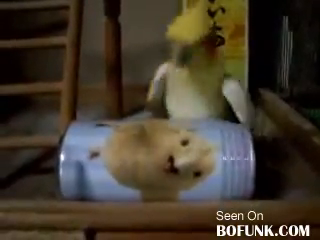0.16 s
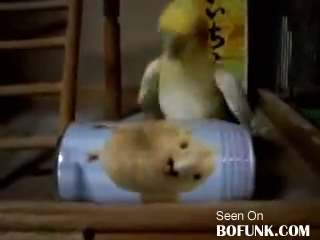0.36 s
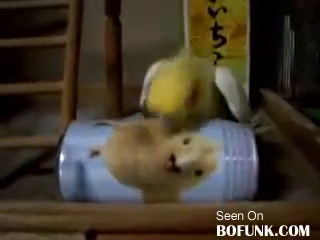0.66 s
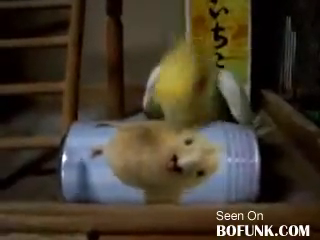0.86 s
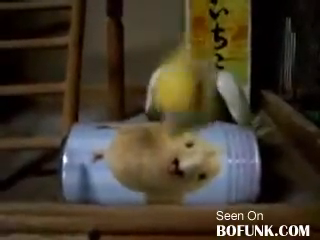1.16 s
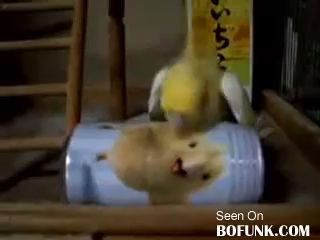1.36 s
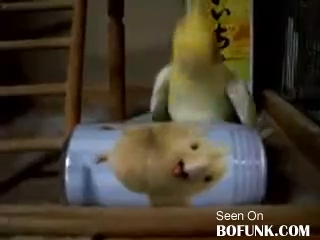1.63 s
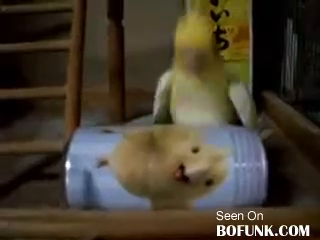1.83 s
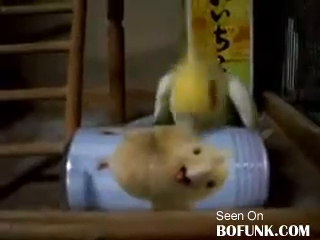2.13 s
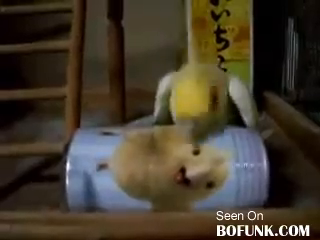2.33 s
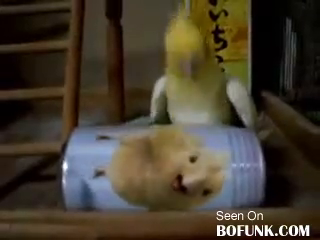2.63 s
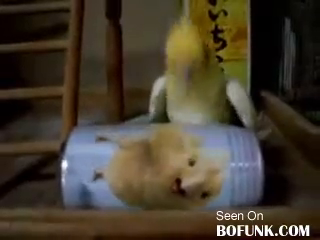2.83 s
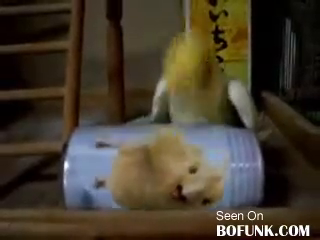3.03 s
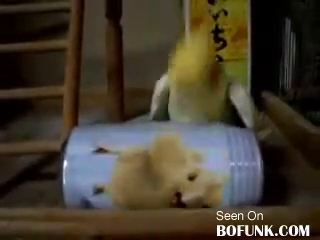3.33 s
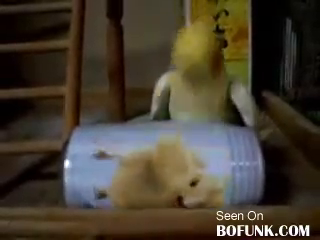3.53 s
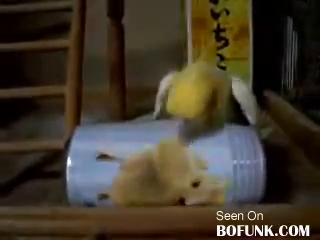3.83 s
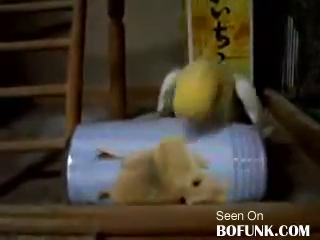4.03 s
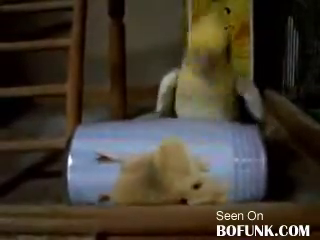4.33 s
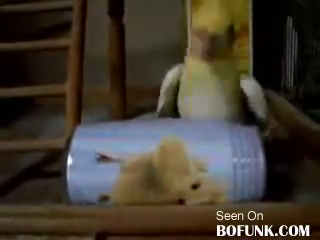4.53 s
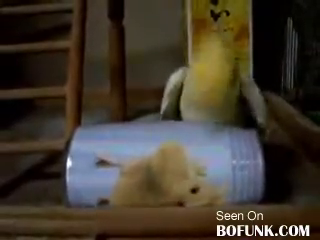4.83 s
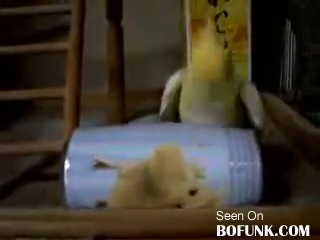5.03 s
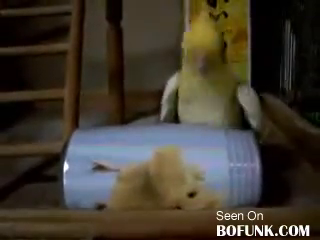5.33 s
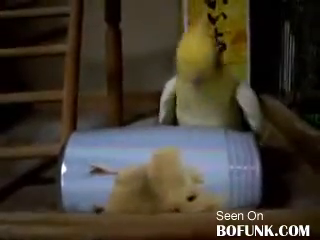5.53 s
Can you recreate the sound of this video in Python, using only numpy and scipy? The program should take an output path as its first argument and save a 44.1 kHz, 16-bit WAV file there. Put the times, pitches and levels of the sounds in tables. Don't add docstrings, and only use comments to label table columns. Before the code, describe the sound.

Thirty or so quick beak taps on a thin hollow can, evenly spaced but varying in pitch and force. After every tap the can rocks back and rattles softly on the boards, its shell humming faintly until the next hit. Some later blows crackle with overload. Close, dull-topped, low-quality indoor sound with short room echo and quiet background noise.

```python
import sys
import numpy as np
from scipy import signal
from scipy.fft import rfft, irfft
from scipy.io import wavfile
from scipy.ndimage import uniform_filter1d

SR = 44100
rng = np.random.default_rng(int(sys.argv[2]) if len(sys.argv) > 2 else 0)


def level_to_linear(level):
    exponent = np.asarray(level, float) / 20
    return 10 ** exponent


def digitize_waveform(pressure):
    field = np.atleast_2d(pressure).T
    bounded = np.clip(field, -1, 1)
    quanta = np.round(bounded * 32767).astype(np.int16)
    wavfile.write(sys.argv[1], SR, quanta)


N = 250047

# start in seconds, level of the dent's lower, middle and upper note in dB.
PECKS = [(0.0118, -32.5, -6.5, -5.5), (0.2096, -13.5, -5.5, -10), (0.4159, -20, -3, -9),
         (0.6164, -1, -3.5, -12), (0.8092, -2.5, 0.5, -12), (0.993, 0, -6.5, -41), (1.1794, -18, -3.5, -21),
         (1.3687, -5, -8, -30.5), (1.556, -7.5, -16, -8.5), (1.7493, -6, -10, -28.5),
         (1.9476, -6.5, -3, -4), (2.129, -10, -16, -7), (2.3141, -3, -12, -12), (2.4929, -6, -16.5, -7.5),
         (2.6809, -3, -19.5, -9.5), (2.8709, -12, -1.5, -16), (3.0686, -23, -24, -11),
         (3.259, -15, -20, -26), (3.4463, -4.5, -8.5, -12), (3.635, -32.5, -0.5, -8.5),
         (3.8215, -5, -3.5, -6.5), (4.0102, -5, -1.5, -7), (4.2044, -26.5, -2, -1), (4.402, -5.5, -2, -4),
         (4.596, -6, -7, -9), (4.7888, -7, -1, -2), (4.9863, -8, 4, -1), (5.1807, -3, -0.5, -9.5),
         (5.372, -23, -10, -2), (5.5607, -5.5, -7.5, -6)]
# start in seconds, level in dB, brightness in dB,
# note left singing in Hz.
ROCKS = [(0.056, -11.5, 1, 1116), (0.253, -12.5, 0.1, 920), (0.435, -21.5, 3, 1520), (0.639, -33, 6, 1302),
         (0.835, -16.5, 1, 1110), (1.039, -14, -1, 925), (1.215, -17, 0, 985), (1.401, -19.5, -3.5, 1133),
         (1.579, -26.5, -3, 1280), (1.776, -17, -1.5, 990), (1.994, -11.5, -1.5, 960),
         (2.167, -16, -0.5, 1010), (2.35, -13, -2.5, 1049), (2.525, -13, -2.5, 998),
         (2.706, -15, -1.7, 1164), (2.902, -18.5, -2, 1315), (3.099, -14.5, -3.5, 1328),
         (3.3, -10.5, 0.5, 1275), (3.482, -16, -1.5, 1138), (3.669, -17.5, 3.5, 1141),
         (3.866, -18.5, 1.5, 1163), (4.046, -13, 2.5, 1161), (4.236, -15, 3, 1150),
         (4.433, -12.5, -2, 1370), (4.618, -17, 0, 1345), (4.813, -42, 28.5, 1165),
         (5.004, -29.5, -4.7, 1154), (5.201, -33, -8, 1238), (5.395, -36, 2, 1165),
         (5.583, -21, -1.5, 1217)]
# start in seconds, level in dB.
TICKS = [
    (0.3603, -7),
    (0.5788, -15.5),
    (0.973, -2.5),
    (3.4308, -22.5),
    (4.581, -18.5),
    (4.7688, -8),
]
# pitch in Hz, level in dB, time to die by 60 dB in seconds.
SHELL_MODES = [(345.4, -2, 0.22), (406, -15.5, 0.59), (539, -8.5, 0.45), (604.2, -1.5, 0.98),
               (730, -7, 0.16), (941, -4, 0.3), (983, 1, 0.23), (1091, 0, 0.25), (1141.5, -3.5, 0.5),
               (1229, -9, .8), (1307, -6.5, 0.51), (1361, -2, 0.4), (1518, -5, 0.36), (1662, -7, 0.47),
               (1724, -6, 0.44), (1843, -5.5, 0.2), (1970, -3.5, 0.3), (2100, -7.5, 0.3), (2306, -12, 0.39),
               (2520, -3, 0.19), (2626, -4, 0.14), (2776, -10, 0.17), (2800, -10, 0.2), (3250, -26, 0.2),
               (3450, -28, 0.15), (3950, -31, 0.12)]
# frequency in Hz, level in dB per Hz.
BOARDS = [(60, -58), (180, -34.5), (250, -14.5), (340, -5.5), (700, -1.5), (1000, -3), (1500, -7),
          (2600, -12.5), (4000, -28.5), (5000, -42.5)]
# frequency in Hz, level in dB per Hz.
WASH = [(60, -38), (350, -18), (450, -9.5), (800, -20), (1000, -14), (1500, -8.5), (2700, -9), (3900, -12),
        (4500, -29.5), (5000, -39)]
# frequency in Hz, time to die by 60 dB in seconds.
ROOM_T60 = [(150, 1), (500, 0.3), (1400, 0.31), (3700, 0.29)]
# frequency in Hz, level in dB per Hz.
HUM = [(24, -13.5), (92, -11), (200, -15), (360, -6), (800, -7), (1200, -10.5), (2600, -6), (4300, -19),
       (5000, -49)]
# time in seconds, splatter in dB, low jolt in dB.
JOLTS = [
    (0.81, -67, -36),
    (0.992, -60.5, -41),
    (1.749, -67, -48),
    (2.681, -52, -43),
    (3.822, -55, -47.5),
    (4.205, -42.5, -36),
    (4.596, -38, -40),
    (4.986, -25.5, -45),
    (5.18, -29, -37),
]
# time in seconds,
# lower, middle and upper note in Hz.
SPOT = [(0.1, 1040, 2100, 2673), (0.415, 1200, 1810, 2844), (0.62, 1095, 1770, 2720),
        (1.0, 1160, 1860, 2590), (1.56, 1190, 1930, 2454), (1.75, 1180, 1600, 2400),
        (1.95, 1060, 1480, 2620), (2.13, 1230, 1530, 2770), (2.5, 1125, 1900, 2520),
        (2.87, 1220, 1810, 2540), (3.26, 1130, 1700, 2570), (3.45, 1150, 2070, 2650),
        (3.63, 1300, 1700, 2590), (4.4, 1330, 1580, 2673), (4.8, 1280, 1600, 2724), (5.0, 1360, 1670, 2713),
        (5.18, 1270, 1530, 2604), (5.37, 980, 1700, 2598)]
# time in seconds, shell ring in dB, singing in dB,
# upper singing note in Hz, treble of the wash in dB.
FREEDOM = [(0.05, 0.5, -26, 2590, -2), (0.25, 1, -40, 2316, -0.5), (0.801, 1.5, -33.5, 1883, 1),
           (1.1, 3.5, -36, 1980, -2.5), (1.7, 0, -40, 2667, 2), (2.1, 0.5, -35, 2306, 0),
           (2.5, 1, -46, 2284, 0.5), (2.8, 0, -30.5, 2300, 4), (3.1, 3.5, -32.5, 1900, -3),
           (3.4, 2.5, -29, 1673, 1.5), (3.998, 3, -26, 1690, -4), (4.6, 2, -35, 1668, -4.5),
           (4.9, -1, -44, 1668, -1), (5.2, 1, -35, 1623, -1.5), (5.401, 1, -38, 2560, -4)]
# time in seconds, crack in dB, treble dropout before it in dB.
SHARP = [(0.415, -18.5, -4), (0.615, -10, -35), (0.809, 2, -34), (1.559, -14, -2), (1.749, -4, -4),
         (1.947, 0, -8.5), (2.681, -17, -28.5), (2.871, -2, -27), (3.448, -1.5, -7), (3.633, -13, -3),
         (3.82, -26.5, -11.5), (4.987, -12, -43), (5.18, -13, 6), (5.56, -25, -35)]

BLUNT_CRACK_DB, BLUNT_DROPOUT_DB = -32.5, -6.5
DENT_T60_S, DENT_T60_S_PER_DB = 0.037, -0.0012
ROCK_S, ROCK_S_PER_DB = 0.032, 0.004
BELLY_HZ = 353
HUM_DB, UPPER_SING_DB = -49, -44
SPLATTER_DB, JOLT_DB = -53.5, -55
SMEAR_DB, SMEAR_PER_DROPOUT = -33, 0.31


def unit(x):
    return x / np.sqrt(np.mean(x ** 2))


def colour(x, points):
    hz, db = np.transpose(points)
    filter_hz = np.fft.rfftfreq(2048, 1 / SR) + 1
    log_gain = np.log(level_to_linear(np.interp(np.log(filter_hz), np.log(hz), db)))
    cepstrum = irfft(log_gain)
    cepstrum[1:1024] *= 2
    cepstrum[1025:] = 0
    response = irfft(np.exp(rfft(cepstrum)))
    return signal.fftconvolve(x, response)[:len(x)]


def band_pass(x, order, low_hz, high_hz):
    return signal.sosfilt(signal.butter(order, [low_hz, high_hz], "band", fs=SR, output="sos"), x)


def no_bass(x):
    return signal.sosfilt(signal.butter(2, 170, "high", fs=SR, output="sos"), x)


def fade(t, t60):
    return np.exp(-np.log(1000) * t / np.maximum(t60, .003))


def flutter(noise, depth_db, size):
    return level_to_linear(depth_db * unit(uniform_filter1d(noise, size=size)))


def add(out, s, x):
    i = max(int(s * SR), 0)
    out[i:i + len(x)] += x[:N - i]


def along(curve, s):
    return [np.interp(s, np.array(curve)[:, 0], col) for col in np.transpose(curve)[1:]]


def pick(table, s, *usual):
    return next((row[1:] for row in table if abs(row[0] - s) < .02), usual)


def hum():
    return level_to_linear(HUM_DB) * unit(colour(rng.standard_normal(N), HUM))


def room(x, wet_db=-14):
    t, response = np.arange(SR // 2) / SR, 0
    hz, t60 = np.transpose(ROOM_T60)
    for centre in 100 * 2. ** np.arange(6):
        band = band_pass(rng.standard_normal(len(t)), 2, centre / np.sqrt(2), centre * np.sqrt(2))
        response = response + band * fade(t, np.interp(np.log(centre), np.log(hz), t60))
    response = response * (1 - np.exp(-t / 0.0067))
    response = response / np.sqrt(np.sum(response ** 2))
    return x + level_to_linear(wet_db) * signal.fftconvolve(x, response)[:N]


def jolts():
    out, t = np.zeros(N), np.arange(SR // 20) / SR
    burst = np.exp(-np.abs(t - .014) / 0.0019) + 0.089 * (t < .026)
    push = np.sin(np.pi * np.minimum(t / 0.0072, 1)) ** 2
    smear_swell = np.exp(-np.abs(t - .012) / 0.0075)
    for s, *_ in PECKS:
        splatter_db, jolt_db = pick(JOLTS, s, SPLATTER_DB, JOLT_DB)
        smear_db = SMEAR_DB + SMEAR_PER_DROPOUT * pick(SHARP, s, BLUNT_DROPOUT_DB)[-1]
        noise = rng.standard_normal((2, len(t)))
        splatter = colour(noise[0], [(4000, -23.0), (5000, 11.5), (7000, -3.5), (10000, -8), (10500, -40.5)])
        smear = colour(noise[1], [(300, -27.5), (1200, 5.0), (3000, -10), (4500, -19), (4900, -74.0)])
        add(out, s - .012, level_to_linear(splatter_db - 7.5) * burst * unit(splatter))
        add(out, s, level_to_linear(jolt_db + 3.5) * push)
        add(out, s - .012, level_to_linear(smear_db) * smear_swell * unit(smear))
    return out


def ticks():
    out, t = np.zeros(N), np.arange(SR // 20) / SR
    for s, db in TICKS:
        scratch = colour(rng.standard_normal(len(t)), [(800, -14.5), (2500, 8), (4500, -11.5)])
        add(out, s, level_to_linear(db - 16.5) * (1 - fade(t, 0.017)) * fade(t, 0.062) * unit(scratch))
    return out


def linger(low_t60=0.59, high_t60=0.39):
    out, t = np.zeros(N), np.arange(SR // 4) / SR
    _, sing_db, upper_hz, _ = along(FREEDOM, np.array(ROCKS)[:, 0])
    swell = (1 - np.exp(-t / 0.02)) * fade(np.maximum(t - .16, 0), 0.11)
    for (s, *_, low_hz), low_db, high_hz in zip(ROCKS, sing_db, upper_hz):
        tone = level_to_linear(low_db + 5.5) * fade(t, low_t60) * np.sin(2 * np.pi * low_hz * t)
        tone += level_to_linear(UPPER_SING_DB + 5.5) * fade(t, high_t60) * np.sin(2 * np.pi * high_hz * t)
        add(out, s, tone * flutter(rng.standard_normal(len(t)), 3.3, 500) * swell)
    return out


def shell(scatter_db, favour_db, split_hz=5):
    hz, db, t60 = np.transpose(SHELL_MODES)[:, :, None]
    t = np.arange(SR // 3) / SR
    chance = rng.standard_normal((favour_db.shape[-1], 3, len(SHELL_MODES)))
    gain = level_to_linear(favour_db + scatter_db * chance[:, :2].T).T * np.sign(chance[:, 2:])
    twin_hz = hz + split_hz * hz / 1000 * rng.uniform(-1.1, 1, hz.shape)
    decay = level_to_linear(db) * fade(t, t60)
    return sum(gain[:, k] @ (decay * np.sin(2 * np.pi * f * t)) for k, f in enumerate([hz, twin_hz]))


def rocking(contacts_hz=750, favour_db=6):
    out, t = np.zeros(N), np.arange(SR // 4) / SR
    driven_hz = np.array([(BELLY_HZ, sing_hz) for *_, sing_hz in ROCKS])
    apart = np.abs(np.array(SHELL_MODES)[:, 0] / driven_hz[:, :, None] - 1).min(axis=1)
    rings = shell(2.5, favour_db * (apart < .02)[:, None].T)
    for (s, db, bright_db, _), ring in zip(ROCKS, rings):
        length = max(ROCK_S - ROCK_S_PER_DB * (db + 10.5), .015)
        chance = rng.random((3, SR // 4))
        swell = (1 - np.exp(-t / 0.002)) * fade(np.maximum(t - 0.71 * length, 0), 0.2)
        touches = chance[0] < contacts_hz / SR
        hits = touches * level_to_linear(-2.2 * np.log(chance[1])) * np.sign(chance[2] - .5)
        force = unit(hits) + 2.4 * (chance[2] - .5)
        force = swell * colour(force, [(250, -bright_db), (2000, bright_db), (4500, 0.62 * bright_db)])
        boards = colour(force, BOARDS)
        damped_ring = ring * fade(np.arange(len(ring)) / SR, 0.34)
        rung = signal.fftconvolve(force, damped_ring)[:len(t)]
        rung = rung * flutter(chance[1] - .5, 3.2, 350) * fade(np.maximum(t - .2, 0), .05)
        busy = int(length * SR)
        add(out, s - .003, level_to_linear(db - 11.5) * boards / np.std(boards[:busy]))
        add(out, s - .003, level_to_linear(db - 13.5) * rung / np.std(rung[busy // 2:2 * busy]))
    return no_bass(out)


def pecks():
    out, t = np.zeros(N), np.arange(SR // 4) / SR
    hz = np.array(SHELL_MODES)[:, :1, None]
    times = np.array(PECKS)[:, 0]
    struck_hz = np.array(along(SPOT, times))
    apart = np.abs(hz / struck_hz - 1).min(axis=1, keepdims=True)
    near = np.exp(-(apart / 0.13) ** 2)
    rings = shell(3.5, 2.0 * np.log2(hz / 1200) + 4 * near - 8 * ((hz > 450) & (hz < 900)))
    ring_levels, _, _, trebles = along(FREEDOM, times)
    rise = 1 - np.exp(-t / 0.00084)
    ring_fade = fade(t, 0.94) * fade(np.maximum(t - .2, 0), .05)
    for blow, notes_hz, ring_db, treble_db, ring in zip(PECKS, struck_hz.T, ring_levels, trebles, rings):
        s, low_db, mid_db, top_db = blow
        low_hz, mid_hz, top_hz = notes_hz
        loudest_db = max(low_db, mid_db, top_db)
        crack_db = pick(SHARP, s, BLUNT_CRACK_DB)[0]
        t60 = DENT_T60_S - DENT_T60_S_PER_DB * min(loudest_db, 0)
        noise = rng.standard_normal((3, len(t)))

        dent = level_to_linear(mid_db + 3.3) * fade(t, 0.38 * t60) * np.sin(2 * np.pi * mid_hz * t)
        dent += level_to_linear(top_db + 1.0) * fade(t, 0.86 * t60) * np.sin(2 * np.pi * top_hz * t)
        dent += level_to_linear(low_db - 4.5) * fade(t, 1.2 * t60) * np.sin(2 * np.pi * low_hz * t)

        crack = unit(band_pass(noise[0], 2, 1900, 4800))
        dent += level_to_linear(crack_db - 14.0) * fade(t, 0.35 * t60) * crack
        dent += level_to_linear(loudest_db + treble_db - 15.5) * fade(t, 0.0047) * crack

        rattle = level_to_linear(5 * np.tanh(unit(uniform_filter1d(noise[2], size=130)) / 1.7))
        wash = [(f, db + treble_db * (f > 3000)) for f, db in WASH]
        dent += level_to_linear(ring_db - 12.5) * fade(t, 0.057) * unit(colour(rattle * noise[1], wash))
        dent += level_to_linear(ring_db - 36.5) * fade(t, 0.37) * unit(colour(rattle * noise[0], wash))

        add(out, s - .0005, rise * dent)
        add(out, s + 0.01, level_to_linear(-22.0) * rise * dent)
        add(out, s, level_to_linear(ring_db - 35.5) * ring[:len(t)] * flutter(noise[2], 4.35, 260) * ring_fade)
    return out


def scene():
    can = no_bass(pecks()) + rocking()
    return (room(can + linger() + ticks()) + hum())[None]


def roll_off(x):
    return signal.sosfilt(signal.butter(12, 10100, fs=SR, output="sos"), x)


def record(dry):
    t, hush = np.arange(N) / SR, np.ones(N)
    for s, *_ in PECKS:
        hush_db = pick(SHARP, s, BLUNT_DROPOUT_DB)[-1]
        hush[(t > s - .015) & (t < s - .003)] = level_to_linear(min(hush_db, 0))
    hush = uniform_filter1d(hush, size=88)
    lows = signal.sosfiltfilt(signal.butter(2, 900, fs=SR, output="sos"), dry)
    starved = hush * dry + (1 - hush) * lows
    x = .88 * np.tanh(starved / .88)
    mirror = band_pass(x * np.cos(2 * np.pi * SR / 4 * t), 3, 6200, 6750)
    narrow = signal.sosfilt(signal.ellip(8, .5, 70, 4560, fs=SR, output="sos"), x)
    return roll_off(narrow + level_to_linear(-21.5) * mirror + jolts())


dry = scene()
out = record(dry)
digitize_waveform(out)
```